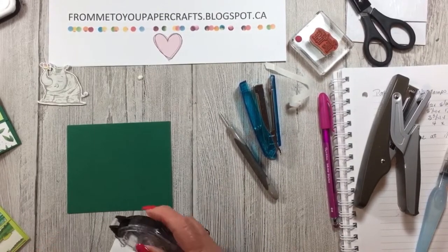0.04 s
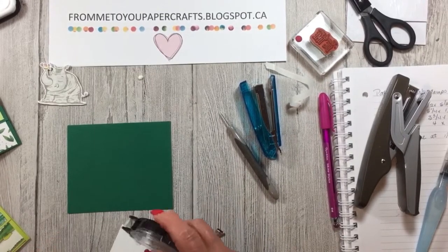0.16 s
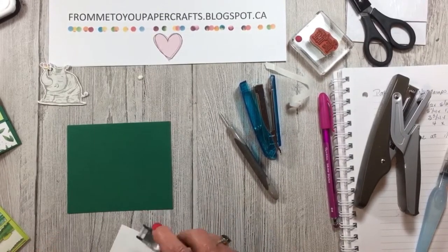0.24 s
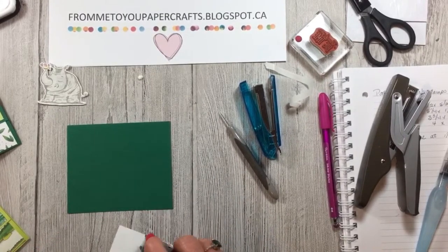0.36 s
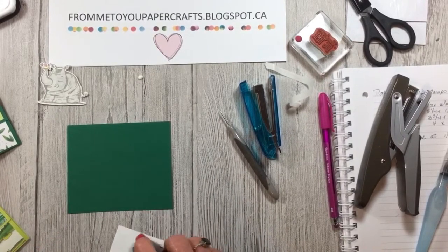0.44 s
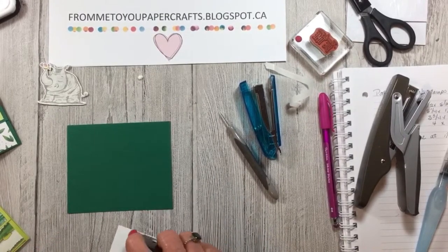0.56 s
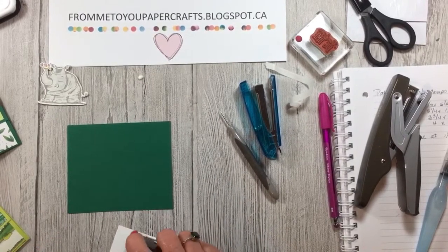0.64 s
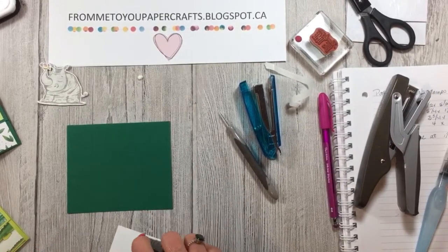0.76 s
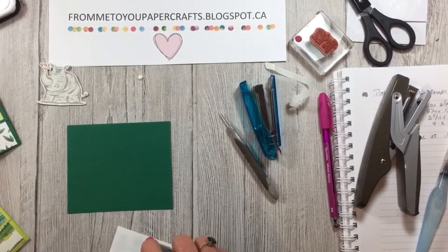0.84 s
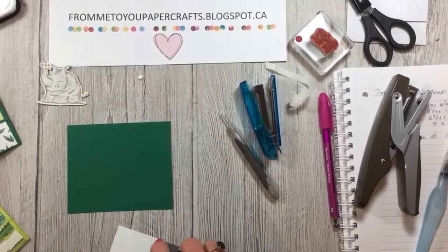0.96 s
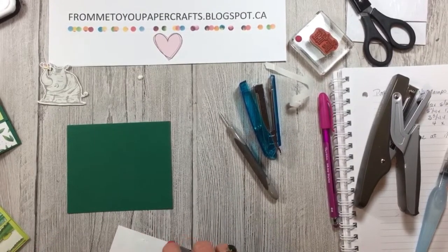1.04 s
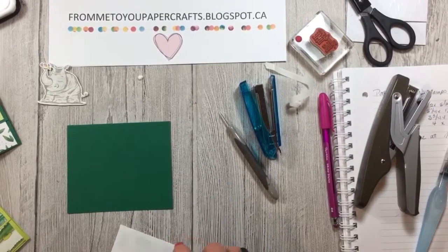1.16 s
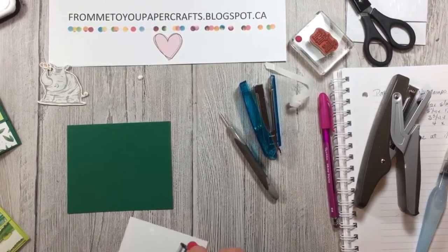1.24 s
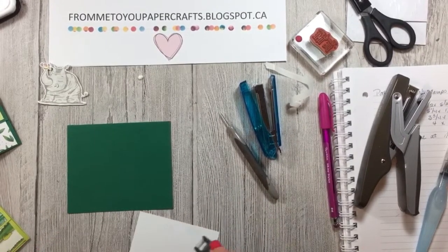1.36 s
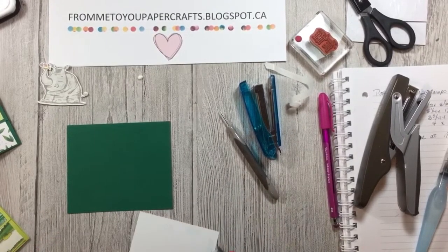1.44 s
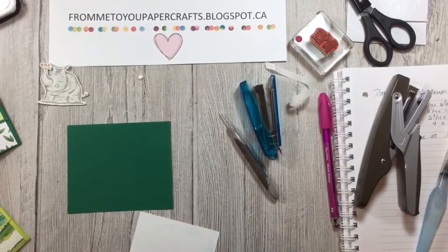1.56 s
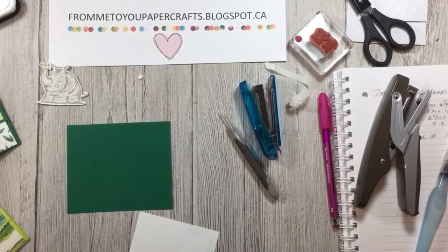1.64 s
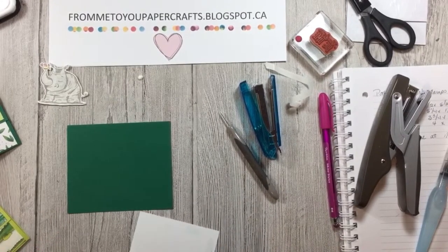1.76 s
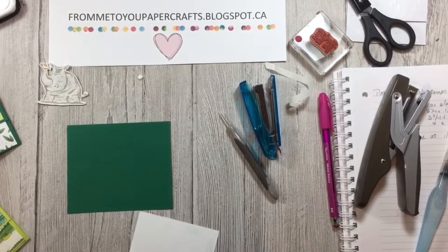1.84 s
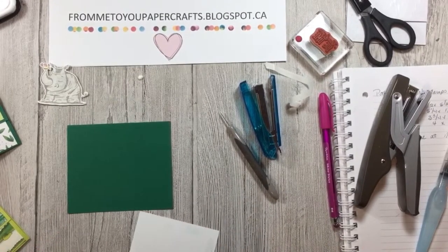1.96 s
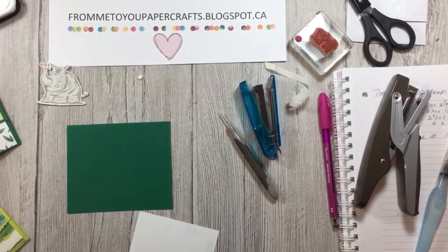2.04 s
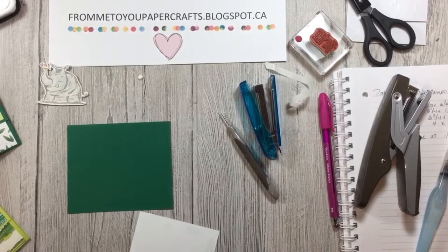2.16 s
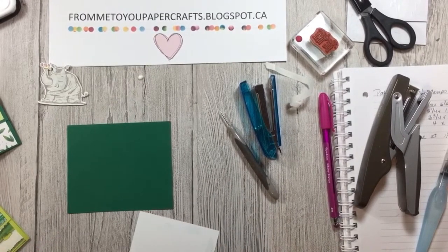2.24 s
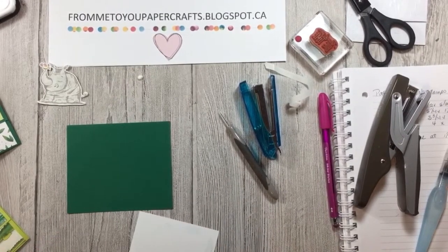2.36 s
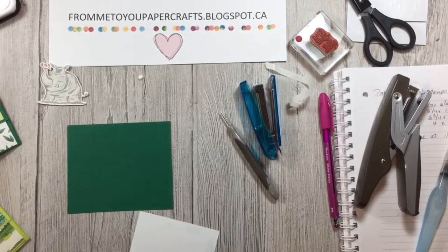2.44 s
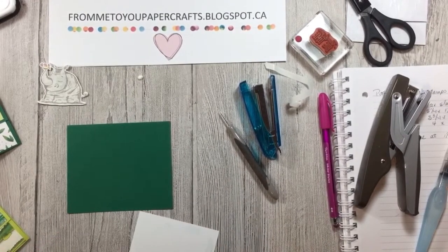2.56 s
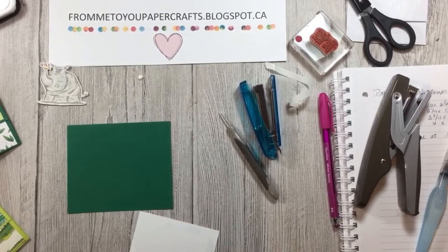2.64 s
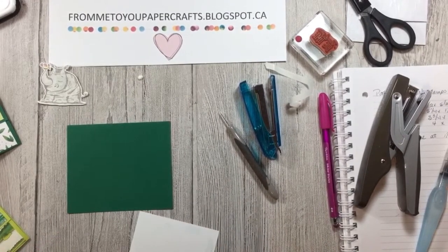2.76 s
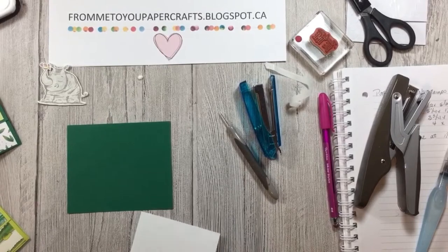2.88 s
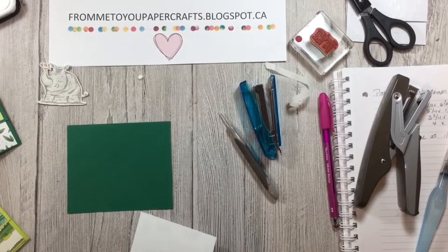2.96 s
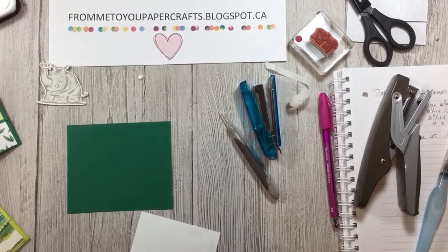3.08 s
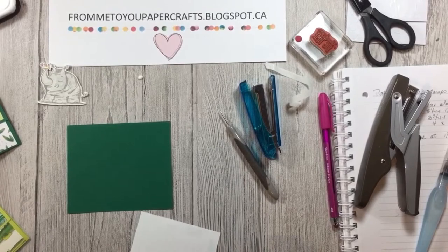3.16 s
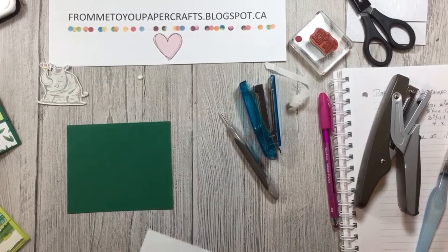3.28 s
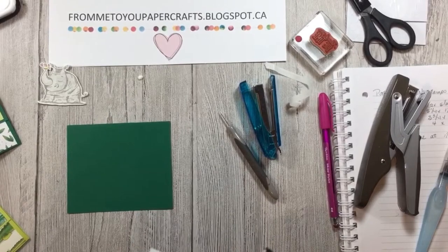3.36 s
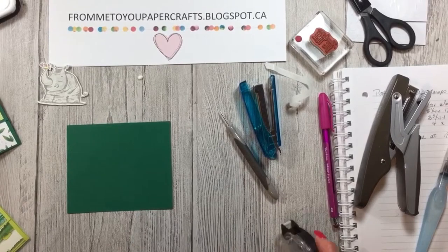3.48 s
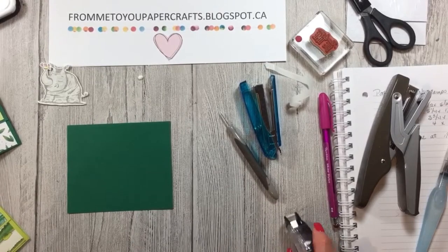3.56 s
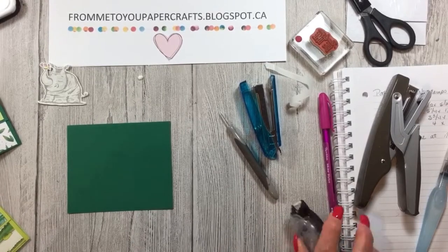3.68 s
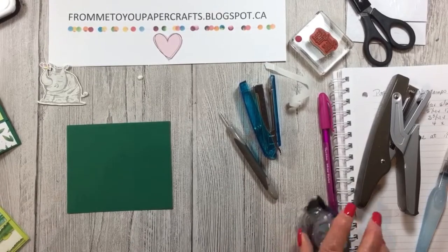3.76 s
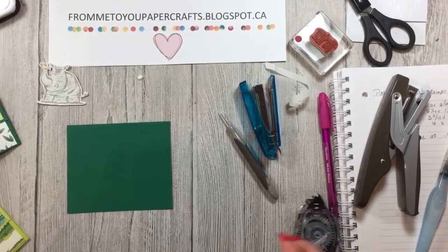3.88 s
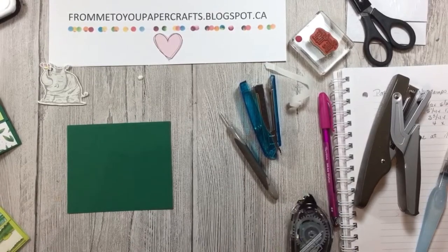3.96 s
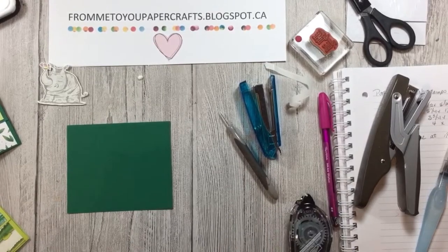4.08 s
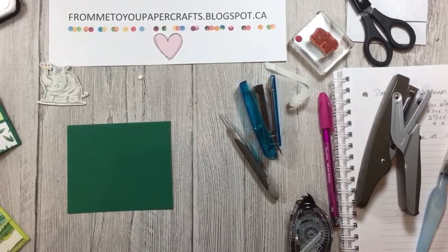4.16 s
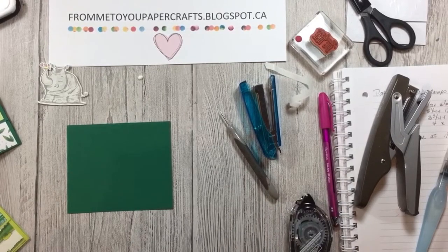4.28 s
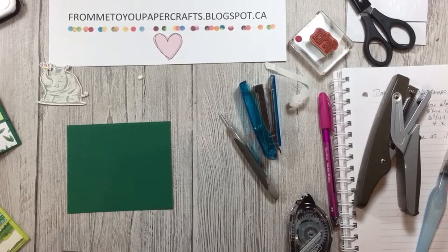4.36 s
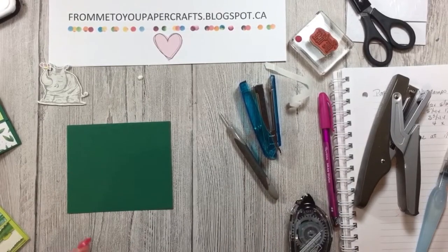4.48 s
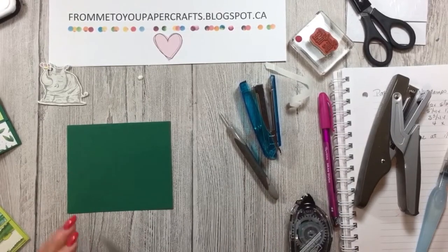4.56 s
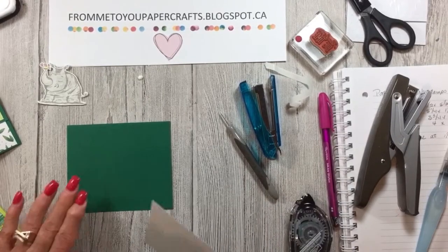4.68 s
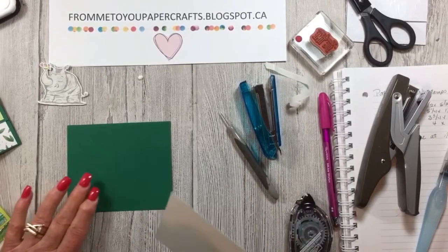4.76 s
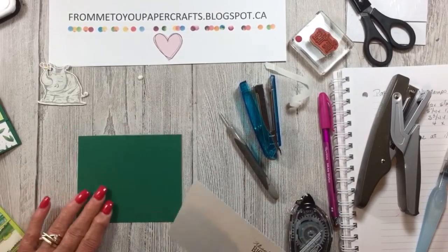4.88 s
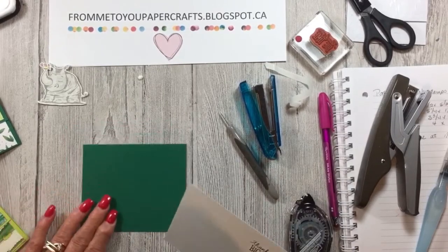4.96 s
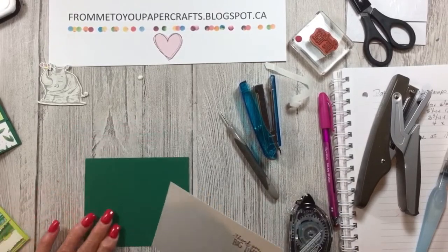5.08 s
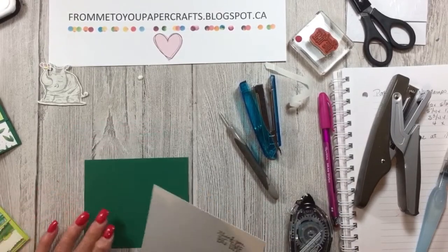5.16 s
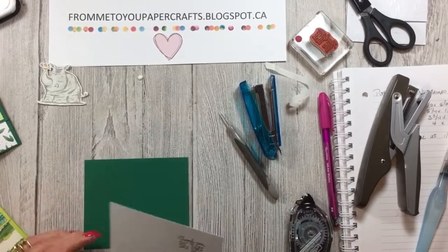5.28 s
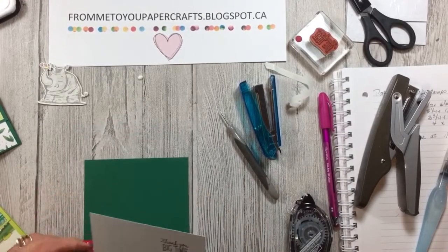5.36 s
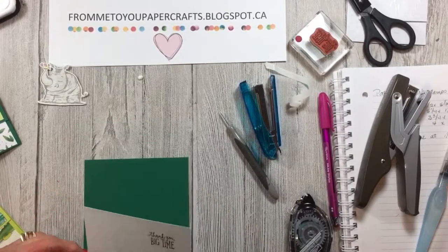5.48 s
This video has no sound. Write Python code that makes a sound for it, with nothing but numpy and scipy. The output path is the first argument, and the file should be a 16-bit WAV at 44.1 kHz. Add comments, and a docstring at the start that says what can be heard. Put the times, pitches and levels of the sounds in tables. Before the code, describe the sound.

Close, dry ratchety zips of a small hollow plastic dispenser, a clattering set-down on a desktop, then papery rustles and tiny metallic clinks.

```python
"""Tape runner on a desk

In a small quiet room with a low hum, the microphone close above, a plastic tape runner is pressed on cardstock
and pulled in four short strokes: scraped teeth ring its hollow case and shaped noise is the peeling tape.
It snaps off and clatters onto the desk: noisy contact forces ring the case and the modes of the desk top.
The card slides as swelling noise and finger rings clink as high decaying sines; diffuse reflections follow."""
import sys
import numpy as np
from scipy import signal
from scipy.fft import rfft, irfft
from scipy.io import wavfile
from scipy.ndimage import uniform_filter1d

SR = 44100
rng = np.random.default_rng(int(sys.argv[2]) if len(sys.argv) > 2 else 0)


def int16_out(signal):
    """Quantize to a 16-bit WAV file."""
    q = np.round(np.clip(np.atleast_2d(signal).T, -1, 1) * 32767)
    wavfile.write(sys.argv[1], SR, q.astype(np.int16))


N = 243608
TIME = np.arange(N) / SR  # s

# All event levels are relative: each layer adds its own gain.
# Steady air noise of the room. Each row: frequency [Hz], relative spectrum level [dB].
ROOM_COLOUR = [(15, -34.5), (25, -12), (40, -9.5), (76, -8), (99, -15), (175, -21), (309, -24),
               (439, -22.5), (754, -27.5), (840, -24.5), (1260, -26.5), (1740, -28.5), (2350, -28),
               (2550, -32), (3080, -34.5), (16000, -48)]
# Room hum. Each row: frequency [Hz], rms level [dB] about which it wavers.
HUM = [(70, -63), (172, -74), (1044, -77), (1303, -79.5)]
# Decay of the room. Each row: frequency [Hz], time to fall by 60 dB [s].
ROOM_T60 = [(200, 0.37), (1400, 0.22), (3700, 0.15), (10000, 0.17), (16000, 0.15)]

# Card sliding on the desk. Each row: start [s], length [s], level at the top of the arch [dB].
SLIDES = [(-0.11, 0.29, -61), (1.227, 0.29, -58), (3.303, 0.32, -59.5), (3.559, 0.23, -59),
          (4.501, 0.088, -61), (4.89, 0.37, -57)]
# Rubbing card. Each row: frequency [Hz], relative spectrum level [dB].
SLIDE_COLOUR = [(880, -45), (1500, -13.5), (2460, -7.5), (2690, -7.5), (4970, -6.5), (5440, -4),
                (9370, -3.5), (10500, -9.5), (11900, -6), (16000, -18)]
SLIDE_SPEED_POWER = 1.36  # loudness against the speed of the card

# Finger rings touching. Each row: start [s], strength [dB].
CLINKS = [(4.7242, -39.5), (4.7621, -51), (4.8065, -56), (4.8374, -64), (4.8938, -62), (5.4116, -39.5),
          (5.4474, -56), (5.4789, -65)]
# Modes of a finger ring. Each row: frequency [Hz], mean level [dB], time to fall by 60 dB [s].
RING = [(9000, -8, 0.043), (10740, -2, 0.11), (10890, -14, 0.11), (14900, 3, 0.03), (15620, -4, 0.055)]

# Modes of the desk top. Each row: frequency [Hz], mean level [dB], undamped time to fall by 60 dB [s].
DESK = [(64, 3, 0.28), (102.5, 7.5, 0.078), (127, 2, 0.13), (153, -10, 0.16), (212, -2.5, 0.037),
        (267, -0.5, 0.04), (323.4, 5, 0.092), (430.4, 1, 0.077), (580, -5.5, 0.04), (740, -0.5, 0.059)]
# Soft presses on the desk. Each row: start [s], peak level [dB], contact time [s].
PRESSES = [(0.703, -32, 0.00097), (1.108, -38, 0.0048), (1.226, -47.5, 0.028), (2.159, -33, 0.0056),
           (2.698, -39, 0.0086), (3.16, -47, 0.034), (4.93, -55, 0.018), (5.483, -56, 0.041)]
# Hard landings that shake the desk. Each row: start [s], peak level [dB], lowest frequency stirred [Hz].
LANDINGS = [(3.053, -41, 90), (3.831, -16.5, 55), (3.912, -25, 100), (3.979, -23, 90), (4.026, -25, 190),
            (4.568, -39, 120)]

# Resonances of the hollow case. Each row: mean frequency [Hz], width [Hz], mean relative level [dB].
CASE = [(1003, 40, 0), (1095, 38, -2), (1316, 43, 3), (1360, 40, 2.5), (1476, 60, 6), (1623, 97, 8),
        (1751, 51, 1), (1922, 26, 5.5), (2003, 31, 6.5), (2336, 70, 0), (2700, 86, 2), (2968, 85, 4.5),
        (3580, 160, -6.5), (4370, 170, -1), (5490, 270, 1.5), (6180, 670, 2), (13160, 770, -9)]
PLACE_SPREAD_DB = 3  # how much the place of contact changes each resonance
LEVEL_WINDOW_S = 0.01  # onset over which a contact's level is set

# Case knocking on the desk; the last row is a soft, long scuff as the hand comes down on the desk. Each row:
# start [s], level [dB], tilt [dB per octave], favoured ring [Hz], time to the crest [s], level of the rebound
# against the knock [dB].
KNOCKS = [(3.829, -24.5, 2.3, 3060, 0.0036, -7), (3.8622, -33.5, 0.5, 4000, 0.0029, -27),
          (3.8946, -30, -3.5, 1240, 0.0023, -7), (3.9052, -29, 14, 6840, 0.003, -20),
          (3.9092, -21.5, -0.5, 1370, 0.002, -13.5), (3.918, -25.5, 2.5, 6000, 0.0018, -25),
          (3.9752, -23.5, 0.5, 1250, 0.0022, -22), (4.0223, -21, 2.5, 3560, 0.0021, -21),
          (4.049, -46, 6, 5500, 0.00089, -24), (4.093, -32, -6.5, 1080, 0.0012, -23),
          (4.1204, -45, 3, 1520, 0.003, -13), (4.1399, -44.5, 1, 2740, 0.0033, -19),
          (4.187, -54.5, 3, 4300, 0.0022, -12), (4.2135, -52.5, -1.5, 2760, 0.0026, -10),
          (4.53, -52, -7.5, 1300, 0.016, -3)]
# Case on desk. Each row: frequency [Hz], relative spectrum level [dB].
KNOCK_COLOUR = [(200, -36), (600, 1.5), (850, 1.5), (1050, 9), (1500, 3.5), (2500, 6.5), (4200, 7),
                (6000, -4), (8000, 2), (10200, -4), (13000, -3), (16000, -10)]
REBOUND_S, REBOUND_CREST_S = 0.011, 0.0024  # delay of the rebound, and its time to the crest

# Sharp snaps of plastic and fingernails. Each row: start [s], level [dB], tilt [dB per octave],
# favoured ring [Hz], decay time of the chatter [s].
SNAPS = [(3.0509, -26, -5, 2700, 0.0015), (3.057, -40.5, -2, 2000, 0.0074),
         (3.0722, -30, -1.5, 2640, 0.0011), (3.6319, -31, 2.5, 5200, 0.0005),
         (3.677, -43, -4, 8700, 0.0069), (4.568, -37, -2.5, 1170, 0.0024), (4.637, -49, -2.5, 2940, 0.0053)]
# A snap. Each row: frequency [Hz], relative spectrum level [dB].
SNAP_COLOUR = [(200, -39), (550, -11), (900, -12), (1400, -8.5), (2600, -1.5), (4200, -2.5), (6500, -5),
               (8000, -1), (10200, -2), (13000, -8), (16000, -12)]

# Case creaking under the hand. Each row: start [s], level [dB], tilt [dB per octave], time to the crest [s].
CREAKS = [(0.701, -45.5, -1.5, 0.0041), (0.772, -36, -9, 0.0045), (1.104, -48.5, -7.5, 0.0062),
          (1.286, -47.5, 4, 0.0038), (1.34, -45, 2, 0.0016), (2.152, -47, -4.5, 0.0042),
          (2.232, -46.5, -9.5, 0.0044), (2.2595, -36.5, -10.5, 0.0014), (2.694, -50.5, -16, 0.0027),
          (2.7107, -39.5, -11.5, 0.002), (3.387, -55.5, -16, 0.0038), (3.718, -61.5, -5, 0.021)]
CREAK_RING_HZ = 1550

# Pulls of the runner. Each row: first tooth [s], number of teeth, tooth gap at full speed [s],
# extra gap setting off [s], extra gap at the stop [s], levels at start, middle and end [dB],
# tilts at start and once under way [dB per octave], favoured ring [Hz], tape level against ratchet [dB].
PULLS = [(0.8105, 7, 0.0175, 0.0098, -0.003, -35, -24.5, -29, 5, -0.5, 1480, -15.5),
         (1.150, 6, 0.0136, 0.0074, 0.0074, -28, -30, -33, 1, 0, 1430, -14.5),
         (2.318, 4, 0.009, 0.0035, 0.0068, -32, -36, -33, -2.5, -3.2, 2900, -12),
         (2.7665, 9, 0.0184, 0.0076, 0.0026, -30.5, -26.5, -34, -2.2, -1.4, 2900, -17)]
# Ratchet ticks and creaks. Each row: frequency [Hz], relative spectrum level [dB].
TICK_COLOUR = [(200, -15), (520, -24), (750, -9.5), (950, -18.5), (1300, -1.5), (2000, -0.5), (3200, 4),
               (6000, 2.5), (8000, -0.5), (10200, -4), (12500, -0.5), (16000, -9.5)]
# Peeling tape. Each row: frequency [Hz], relative spectrum level [dB].
PEEL_COLOUR = [(530, -40), (900, -20), (1420, 5.5), (1900, -5.5), (2930, 5), (3550, 1), (6720, -10),
               (7770, -15), (9090, -10), (15200, -54), (16000, -26.5)]
HAND_INERTIA = 0.35  # share of the extra gap left one tooth further into the pull
PRESSURE_CREST = 0.4  # share of a pull at which the middle level is reached
TILT_SETTLED = 0.19  # share of a pull after which its tone has settled
TOOTH_CREST_S, TOOTH_SPREAD_DB = 0.0017, 0.6
TOOTH_WANDER = 0.028  # greatest relative rise of the favoured ring from tooth to tooth
TOOTH_THUD_DB = -44.0  # peak of the desk's answer to the teeth
PEEL_ATTACK_S, PEEL_RELEASE_S, PEEL_FADE_DB = 0.031, 0.16, 33


def from_db(db):
    """Decibels to gain."""
    return 10 ** (np.asarray(db) / 20)


def rms_one(x):
    """Scale to rms 1."""
    return x / np.sqrt(np.mean(x ** 2) + 1e-30)


def at_hz(points, hz):
    """Read a table on a log-frequency axis."""
    table = np.array(points)
    return np.interp(np.log(np.maximum(hz, 1)), np.log(table[:, 0]), table[:, 1])


def add(out, s, sound):
    """Mix a sound in at time s."""
    start = max(round(s * SR), 0)
    part = sound[:max(N - start, 0)]
    out[start:start + len(part)] += part


def coloured(x, colour):
    """Causal (minimum-phase) filter with the given spectrum, made by folding its cepstrum."""
    size = 2 * len(x)
    hz = np.arange(size // 2 + 1) * SR / size
    cepstrum = irfft(np.log(from_db(at_hz(colour, hz))))
    cepstrum[1:size // 2] *= 2
    cepstrum[size // 2 + 1:] = 0
    return irfft(rfft(x, size) * np.exp(rfft(cepstrum)))[:len(x)]


def band(x, low_hz, high_hz):
    """Butterworth band-pass."""
    edges = [low_hz, min(high_hz, SR / 2 - 100)]
    return signal.sosfilt(signal.butter(2, edges, "band", fs=SR, output="sos"), x)


def resonate(x, hz, width_hz):
    """One resonance with gain 1 on top."""
    r = np.exp(-np.pi * width_hz / SR)
    zeros = np.array([1, 0, -1]) * (1 - r * r) / 2
    poles = [1, -2 * r * np.cos(2 * np.pi * hz / SR), r * r]
    return signal.lfilter(zeros, poles, x)


def dying(t, t60):
    """Exponential decay by 60 dB in t60."""
    return np.exp(-np.log(1000) * t / t60)


def drift(per_s):
    """Slow random wander of rms 1, with per_s random points a second."""
    return rms_one(np.interp(TIME * per_s, np.arange(4000), rng.standard_normal(4000)))


def grains(size, spread_db):
    """A run of micro-impacts of very uneven strength."""
    return rng.standard_normal(size) * from_db(spread_db * rng.standard_normal(size))


def swell(t, crest_s, sharpness, tail_db, tail_t60):
    """Contact pressure that builds to a crest and leaves loose parts buzzing."""
    age = t / max(crest_s, 1e-4)
    crest = (age * np.exp(1 - age)) ** sharpness
    buzz = from_db(tail_db) * np.minimum(age, 1) * dying(t, tail_t60)
    return crest + buzz


def struck(modes, spread_db):
    """Ring of a struck object as decaying sines; each blow weights the modes anew."""
    t = TIME[:SR // 2]
    ring = np.zeros(len(t))
    for hz, db, t60 in modes:
        gain = from_db(db + spread_db * rng.normal())
        ring += gain * np.sin(2 * np.pi * hz * t) * dying(t, t60)
    return ring


def friction(level, colour, grain_db, flutter_db):
    """Countless tiny slips of fibres, swelling with the given strength of each stroke."""
    unevenness_db = grain_db * rng.standard_normal(N) + flutter_db * drift(150)
    slips = rng.standard_normal(N) * from_db(unevenness_db)
    return uniform_filter1d(level, size=200) * rms_one(coloured(slips, colour))


def room_tone(air_db, waver_db):
    """Steady air noise and a faint hum wavering in level and phase."""
    tone = from_db(air_db) * rms_one(coloured(rng.standard_normal(N), ROOM_COLOUR))
    for hz, db in HUM:
        level = from_db(db + waver_db * drift(2.68)) * np.sqrt(2)  # rms to peak
        tone += level * np.sin(2 * np.pi * hz * TIME + 0.55 * drift(18))
    return tone


def room(x, onset_s):
    """Diffuse reflections that build up quickly and die at a rate set for each frequency band."""
    t, edges = TIME[:SR // 2], np.geomspace(100, 17000, 12)
    response = np.zeros(len(t))
    for low_hz, high_hz in zip(edges, edges[1:]):
        t60 = at_hz(ROOM_T60, np.sqrt(low_hz * high_hz))
        response += band(rng.standard_normal(len(t)), low_hz, high_hz) * dying(t, t60)
    response *= 1 - np.exp(-(t / onset_s) ** 2)
    return signal.fftconvolve(x, response / np.sqrt(np.sum(response ** 2)))[:N]


def sliding():
    """Strength of the card's rubbing: each slide speeds up and slows down in one arch."""
    level = np.zeros(N)
    for s, length_s, db in SLIDES:
        speed = np.abs(np.sin(np.pi * np.clip((TIME - s) / length_s, 0, 1)))
        level += from_db(db) * speed ** SLIDE_SPEED_POWER
    return level


def rings(level_db):
    """Small metal rings touch with a bright noise tick and a very high ping."""
    out = np.zeros(N)
    for s, strength_db in CLINKS:
        ping = struck(RING, spread_db=2.5)
        burst = rng.standard_normal(len(ping)) * dying(TIME[:len(ping)], 0.04)
        tick = band(burst, 7000, 16000)
        add(out, s, from_db(strength_db + level_db) * (ping + 0.5 * tick))
    return out


def desk_thud(force, peak_db, damping_t60):
    """The desk top rings under a force, damped by what rests on it; its slowest bending radiates no sound."""
    ring = struck(DESK, spread_db=1.6)
    ring = ring * dying(TIME[:len(ring)], damping_t60)
    thud = band(signal.fftconvolve(ring, force), 63.6, 1270)
    return from_db(peak_db) * thud / np.abs(thud).max()


def presses(level_db):
    """Smooth push on the desk top: a longer contact favours its lowest modes."""
    out, t = np.zeros(N), TIME[:SR // 20]
    for s, peak_db, contact_s in PRESSES:
        age = 2 * np.pi * t / max(contact_s, 1e-4)
        push = age * np.exp(-age)
        add(out, s, desk_thud(push, peak_db + level_db, damping_t60=0.99))
    return out


def landings(level_db, settle_s, chatter):
    """The case hits the desk top with one impulse and a brief chatter, each with its own lowest frequency."""
    out, t = np.zeros(N), TIME[:SR // 20]
    for s, peak_db, lowest_hz in LANDINGS:
        force = chatter * np.exp(-t / settle_s) * rng.standard_normal(len(t))
        force[0] += 1
        add(out, s, desk_thud(band(force, lowest_hz, 960), peak_db + level_db, damping_t60=1.0))
    return out


def case_contact(force, colour, ring_db, level_db, tilt_db, detune):
    """A force rings the hollow case; tilt leans the tone to treble or bass, level is that of the onset."""
    sound = force.copy()
    for hz, width_hz, db in CASE:
        gain = from_db(db + ring_db + PLACE_SPREAD_DB * rng.normal())
        sound += gain * resonate(force, hz * (1 + detune * rng.normal()), width_hz)
    tilted = [(hz, db + tilt_db * np.log2(np.clip(hz, 1400, 9000))) for hz, db in colour]
    sound = coloured(sound, tilted)
    return from_db(level_db) * sound / np.std(sound[:round(LEVEL_WINDOW_S * SR)])


def knocks(level_db, ring_db, spot_db):
    """The case lands edge by edge, each knock followed by a rebound, with loose parts buzzing inside; a soft
    scuff of the hand coming down is rendered the same way."""
    blows = []
    for s, db, tilt_db, hz, crest_s, rebound_db in KNOCKS:
        blows.append((s, db, tilt_db, hz, crest_s))
        blows.append((s + REBOUND_S, db + rebound_db, tilt_db, hz, REBOUND_CREST_S))
    out, t = np.zeros(N), TIME[:4096]
    for s, db, tilt_db, hz, crest_s in blows:
        pressure = swell(t, crest_s, sharpness=1.0, tail_db=-16, tail_t60=0.06)
        force = pressure * grains(len(t), spread_db=3.0)
        force += from_db(spot_db) * resonate(force, hz, hz * 0.45)
        add(out, s, case_contact(force, KNOCK_COLOUR, ring_db, db, tilt_db, detune=0.0041))
    return from_db(level_db) * out


def snaps(level_db, ring_db, spot_db, crack):
    """A sudden release: one crack and a very short chatter, ringing the spot where it happens."""
    out, t = np.zeros(N), TIME[:4096]
    for s, db, tilt_db, hz, decay_s in SNAPS:
        chatter = np.exp(-t / max(decay_s, 1e-4)) + from_db(-20) * dying(t, 0.06)
        force = chatter * rng.standard_normal(len(t))
        force[0] += crack
        force += from_db(spot_db) * resonate(force, hz, hz * 0.36)
        add(out, s, case_contact(force, SNAP_COLOUR, ring_db, db, tilt_db, detune=0.012))
    return from_db(level_db) * out


def scrape(crest_s, hz, spot_db):
    """Force of plastic slipping over plastic, favouring one resonance."""
    t = TIME[:4096]
    pressure = swell(t, crest_s, sharpness=0.69, tail_db=-35, tail_t60=0.14)
    force = pressure * grains(len(t), spread_db=4.5)
    return force + from_db(spot_db) * resonate(force, hz, hz * 0.1)


def creaks(level_db, ring_db, spot_db):
    """Single slips in the case as the hand loads it or lets go."""
    out = np.zeros(N)
    for s, db, tilt_db, crest_s in CREAKS:
        force = scrape(crest_s, CREAK_RING_HZ, spot_db)
        add(out, s, case_contact(force, TICK_COLOUR, ring_db, db, tilt_db, detune=0.0041))
    return from_db(level_db) * out


def teeth(pull):
    """Times and levels of the teeth in one pull: the hand sets off, settles to an even run and stops."""
    start_s, count, gap_s, set_off_s, stop_s, *pressure_db = pull[:8]
    extra = HAND_INERTIA ** np.arange(round(count) - 1)
    gaps = gap_s + set_off_s * extra + stop_s * extra[::-1]
    times = start_s + np.cumsum(np.r_[0, gaps])
    progress = np.linspace(0, 1, len(times))
    return times, np.interp(progress, [0, PRESSURE_CREST, 1], pressure_db)


def peeling():
    """Strength of the tape's peeling: it follows the pressure of each pull and fades after the last tooth."""
    level = np.zeros(N)
    for pull in PULLS:
        times, db = teeth(pull)
        tape_db = pull[-1]
        times = np.r_[times[0] - PEEL_ATTACK_S, times, times[-1] + PEEL_RELEASE_S]
        db = np.r_[db[0] - PEEL_FADE_DB, db, db[-1] - PEEL_FADE_DB] + tape_db
        level += from_db(np.interp(TIME, times, db, left=-np.inf, right=-np.inf))
    return level


def ratchet(level_db, ring_db, spot_db):
    """The pawl scrapes over one tooth after another while the spool turns; each tooth also nudges the desk."""
    out, nudges = np.zeros(N), np.zeros(N)
    for pull in PULLS:
        first_tilt_db, last_tilt_db, hz, _ = pull[8:]
        times, levels = teeth(pull)
        progress = np.linspace(0, 1, len(times))
        tilts = np.interp(progress, [0, TILT_SETTLED], [first_tilt_db, last_tilt_db])
        for s, db, tilt_db in zip(times, levels, tilts):
            tooth_hz = hz * (1 + TOOTH_WANDER * rng.uniform(-0.77, 1))
            force = scrape(TOOTH_CREST_S, tooth_hz, spot_db)
            tooth_db = db + TOOTH_SPREAD_DB * rng.normal()
            add(out, s, case_contact(force, TICK_COLOUR, ring_db, tooth_db, tilt_db, detune=0.022))
            add(nudges, s, from_db([db]))
    return from_db(level_db) * out + desk_thud(nudges, TOOTH_THUD_DB, damping_t60=0.71)[:N]


def scene():
    """Runner, desk, card and rings close to the microphone, with the room around them."""
    background = room_tone(air_db=-61.0, waver_db=1.0)
    card = from_db(5.5) * friction(sliding(), SLIDE_COLOUR, grain_db=3.5, flutter_db=2.2)
    clinks = rings(level_db=-8.0)
    thuds = presses(level_db=4.5) + landings(level_db=-2.5, settle_s=0.0014, chatter=0.12)
    runner = knocks(level_db=-0.1, ring_db=0.5, spot_db=3.0)
    runner += snaps(level_db=-0.5, ring_db=-17.0, spot_db=2.5, crack=1.9)
    runner += creaks(level_db=0.9, ring_db=-7.5, spot_db=1.5)
    tape = friction(peeling(), PEEL_COLOUR, grain_db=1.0, flutter_db=2.0)
    runner += ratchet(level_db=-1.3, ring_db=-2.0, spot_db=2.5)
    near = card + clinks + thuds + runner + tape
    reflections = from_db(-9.5) * room(near, onset_s=0.0028)
    return (near + reflections + background)[None]  # one channel


def record(dry):
    """The microphone signal is cut steeply above 16.1 kHz."""
    low_pass = signal.ellip(10, 0.1, 70, 16100, fs=SR, output="sos")
    return signal.sosfilt(low_pass, dry)


dry = scene()
out = record(dry)
int16_out(out)
```